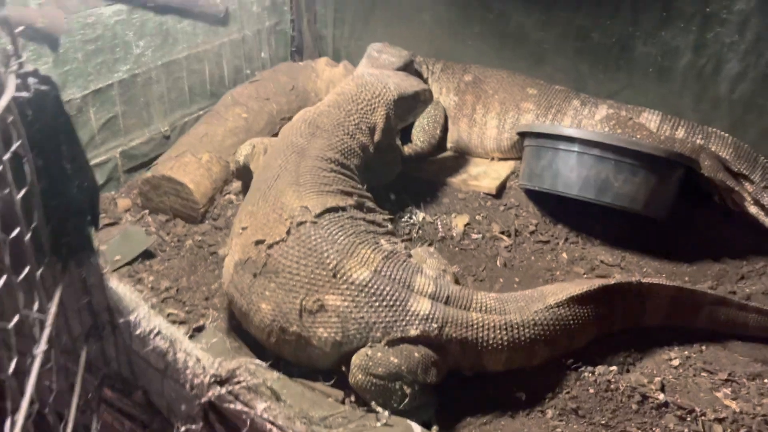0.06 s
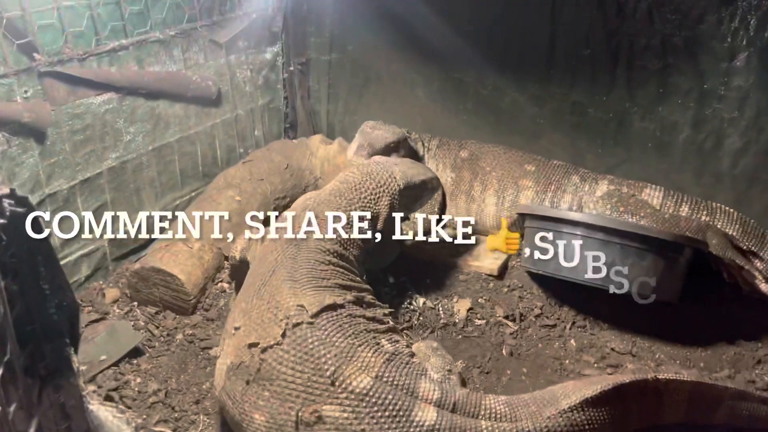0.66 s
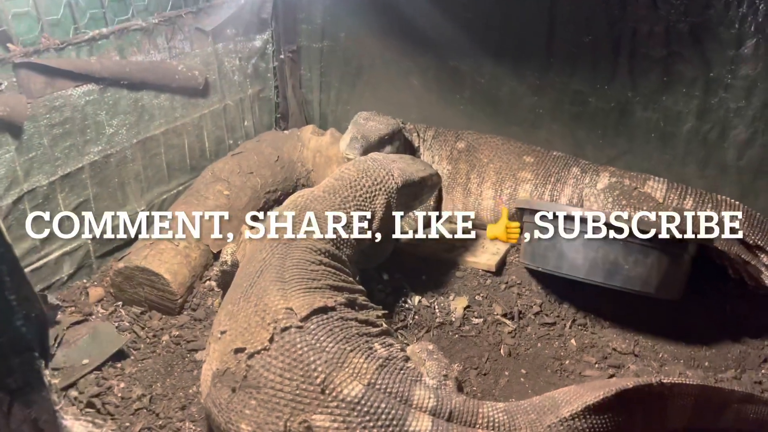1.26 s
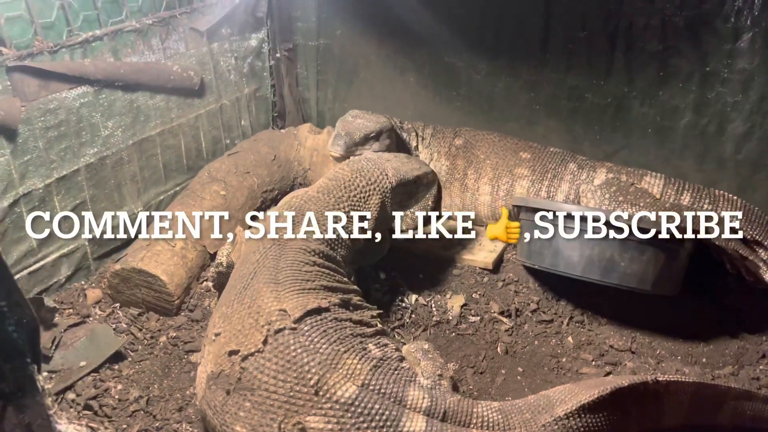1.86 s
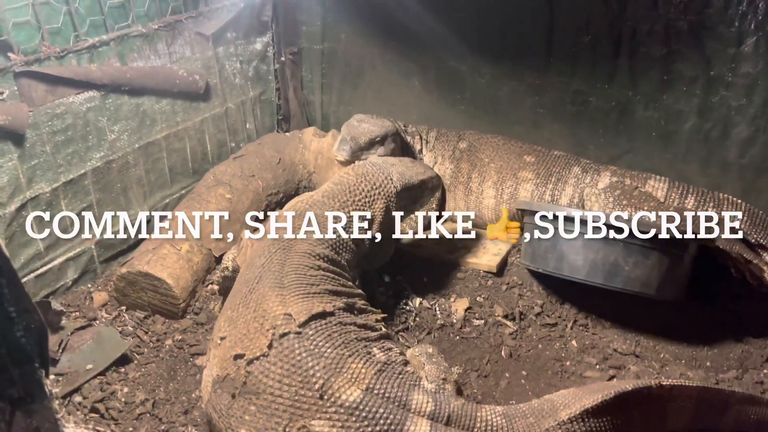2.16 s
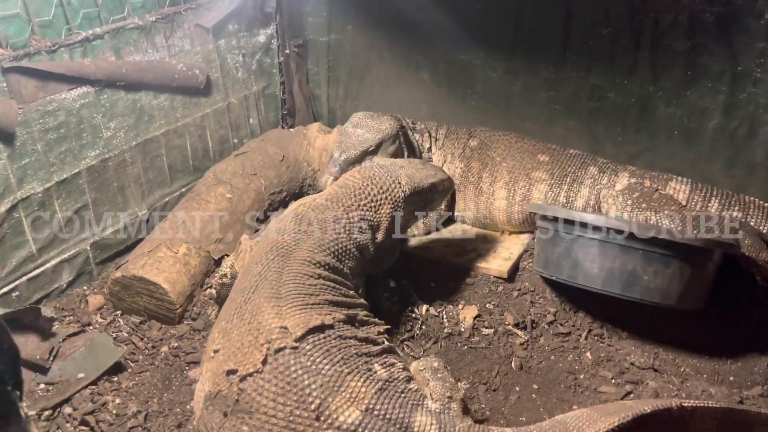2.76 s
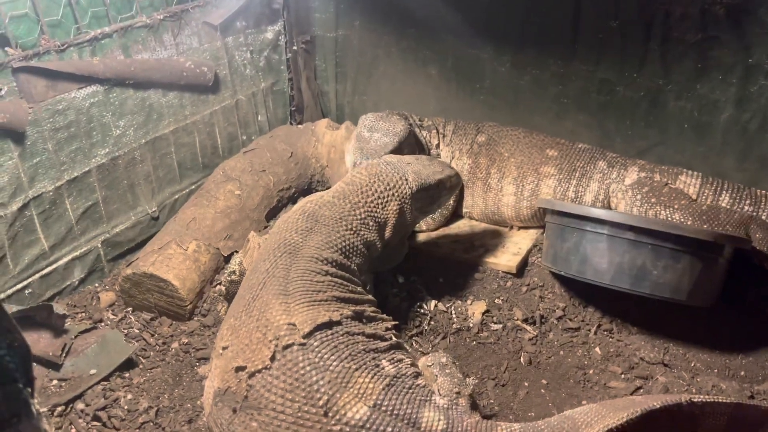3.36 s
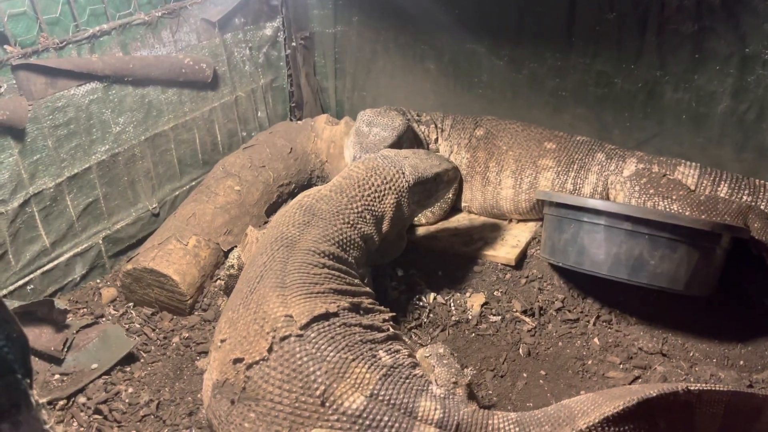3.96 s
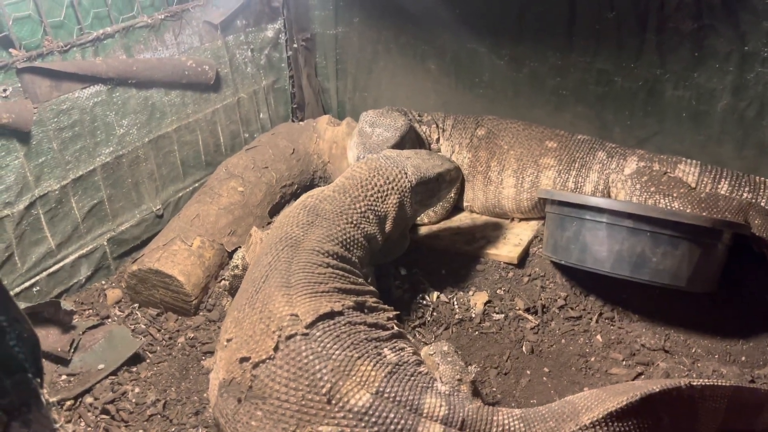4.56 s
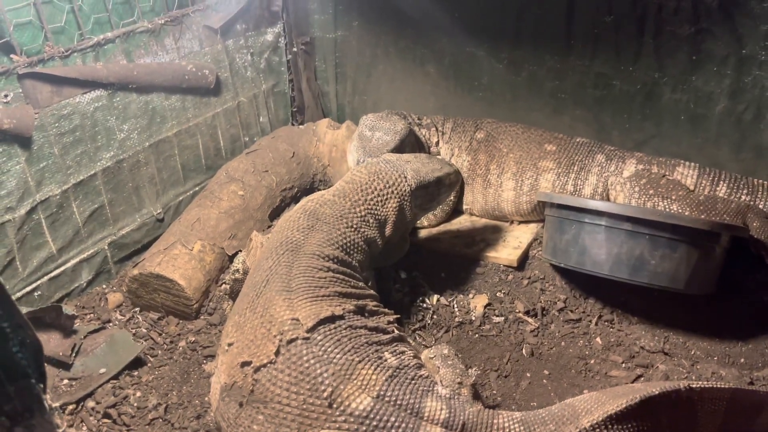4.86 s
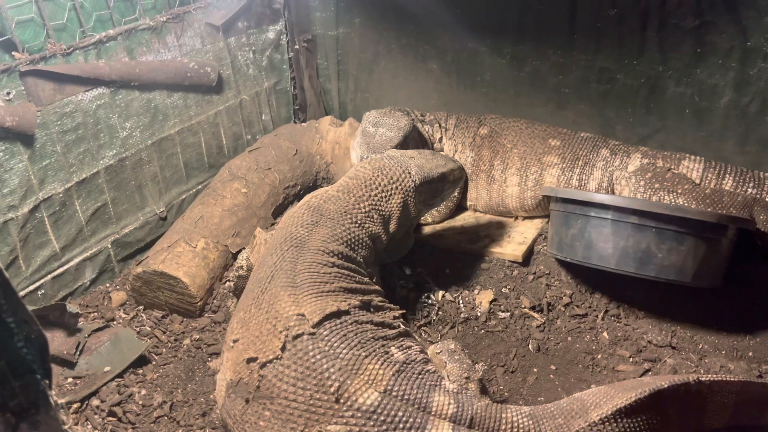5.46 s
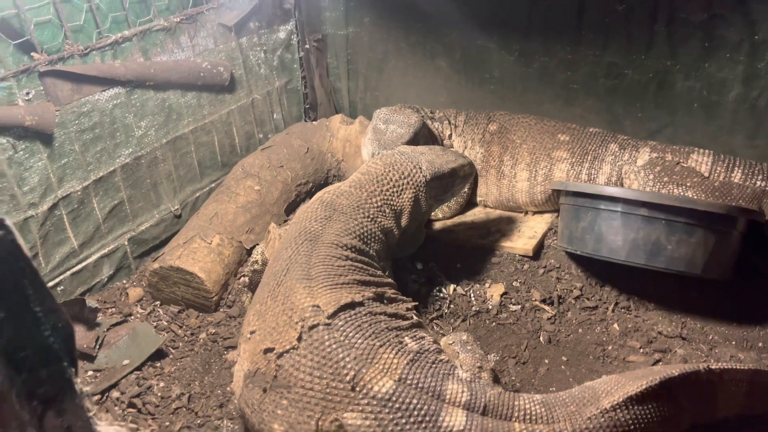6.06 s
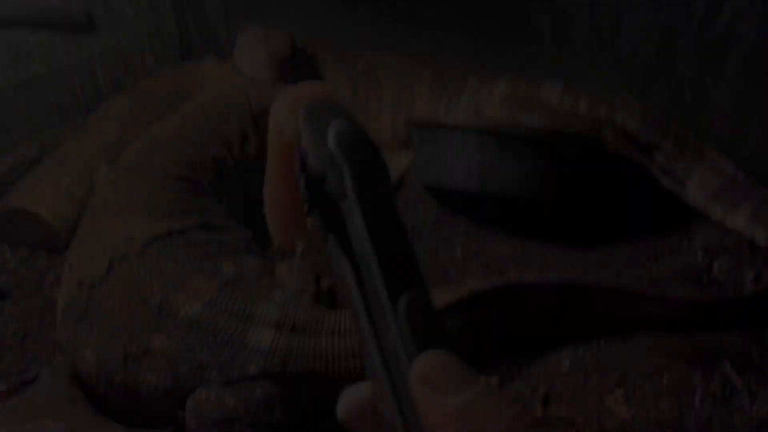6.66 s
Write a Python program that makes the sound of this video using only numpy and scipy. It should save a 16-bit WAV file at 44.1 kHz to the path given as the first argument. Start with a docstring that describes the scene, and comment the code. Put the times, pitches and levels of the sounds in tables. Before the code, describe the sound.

Sharp, close snaps of a training clicker come in three quick runs with short pauses, over faint room rumble and hiss.

```python
"""A small, quiet animal enclosure, heard from a hand-held camera: faint rumble, room air and hiss.
A hand settles its grip with tiny ticks and one knock. From 1.3 s a training clicker, close by, gives five
clicks: the button meets the steel tongue, which snaps through, buzzes and springs back; near walls ring
briefly, and the loose button ticks between strokes. The hiss sinks as the palm rubs and bumps the camera.
Two more runs of five follow at 3.1 s and 4.9 s, and a surge of hiss closes the scene."""
import sys
import numpy as np
from scipy import signal
from scipy.fft import rfft, irfft, next_fast_len
from scipy.io import wavfile
from scipy.ndimage import map_coordinates

SR = 44100
rng = np.random.default_rng(int(sys.argv[2]) if len(sys.argv) > 2 else 0)


def dump(signal):
    """Clip the signal to [-1, 1] and save it as 16-bit WAV at the path in sys.argv[1]."""
    limited = np.clip(np.atleast_2d(signal).T, -1, 1)
    pcm = np.round(limited * 32767).astype(np.int16)
    wavfile.write(sys.argv[1], SR, pcm)


N = 296660
TOP_HZ = 16600  # upper edge of the microphone's band

# likeness of left and right for direct and for diffuse sound: (frequency [Hz], correlation [-1..1])
DIRECT_LIKENESS = [(200, -0.93), (1200, 0.93), (2500, .3), (5000, -0.49), (6000, 0.66), (12000, 0.97)]
DIFFUSE_LIKENESS = [(100, 0.064), (400, 0.37), (900, -0.3), (5200, 0.11), (6000, 0.52), (12000, 1)]
# spectrum of the rumble and of bumps on the camera: (frequency [Hz], gain [dB])
RUMBLE_SPECTRUM = [(10, -23.5), (25, -4.5), (45, -0.5), (75, 3.5), (105, -1.5), (150, -13.5), (300, -31.5),
                   (1000, -74.5)]
# spectrum of a light touch on button or case: (frequency [Hz], gain [dB])
TICK_SPECTRUM = [(60, -9), (550, -12.5), (900, -7), (1300, -4), (1750, 1.5), (2300, -2), (3800, 2),
                 (5200, 3), (8000, -8), (10600, 2), (12200, -18.5), (13600, -45.5)]


def amp(db):
    """Decibels to amplitude."""
    return 10 ** (np.asarray(db) / 20)


def along(points, hz):
    """Read (frequency [Hz], value) points on a log frequency axis."""
    frequencies, values = np.transpose(points)
    return np.interp(np.log(hz + 1), np.log(frequencies + 1), values)


def level(points):
    """The gain of a (time [s], level [dB]) curve at every sample."""
    return amp(np.interp(np.arange(N) / SR, *np.transpose(points)))


def fade(t, t60):
    """An exponential decay, 60 dB down after t60 seconds."""
    return np.exp(-np.log(1000) * t / t60)


def add(track, at_s, sound):
    """Mix a stereo sound into the track."""
    start = round(at_s * SR)
    track[:, start:start + sound.shape[1]] += sound[:, :N - start]


def filtered(x, response):
    """Pass x through a complex response of frequency."""
    size = x.shape[-1]
    padded = next_fast_len(size + SR // 8)
    hz = np.fft.rfftfreq(padded, 1 / SR)
    return irfft(rfft(x, padded) * response(hz), padded)[..., :size]


def coloured(x, spectrum):
    """Shape x by a (frequency [Hz], gain [dB]) curve."""
    return filtered(x, lambda hz: amp(along(spectrum, hz)))


def causal(db):
    """The minimum-phase response with these gains: it rings only after the blow."""
    cepstrum = irfft(np.log(amp(db)))
    half = len(cepstrum) // 2
    fold = np.r_[1, np.full(half - 1, 2), 1, np.zeros(half - 1)]
    return np.exp(rfft(cepstrum * fold))


def stereo_noise(size, likeness):
    """White noise whose channels are as alike as given."""
    def mid_side_gains(hz):
        angle = np.arccos(np.clip(along(likeness, hz), -1, 1)) / 2
        return np.array([np.cos(angle), np.sin(angle)])
    mid, side = filtered(rng.standard_normal((2, size)), mid_side_gains)
    return np.array([mid + side, mid - side])


def bed(spectrum, waver_db, rate_hz):
    """Diffuse noise around the microphone; its level wavers a little."""
    noise = coloured(stereo_noise(N, DIFFUSE_LIKENESS), spectrum)
    t = np.arange(N) / SR
    waver = map_coordinates(rng.standard_normal(int(t[-1] * rate_hz) + 4), [t * rate_hz])
    return noise / noise.std() * amp(waver_db * waver)


def room_tone():
    """The enclosure itself: low rumble leaning left, room air and a thin, faint whistle."""
    # slow rise and fall of each layer: (time [s], relative level [dB])
    rumble_levels = [(0.0, -69), (0.37, -72.5), (0.96, -69.5), (1.44, -76), (2.79, -65), (3.45, -80.5),
                     (4.35, -84), (6.73, -76.5)]
    air_levels = [(0.0, -70.5), (0.28, -73), (1.35, -72), (1.46, -75.5), (2.9, -77.5), (4.33, -88),
                  (4.61, -83), (5.92, -84.5), (6.27, -73), (6.73, -76.5)]
    whistle_levels = [(0, -70.5), (2.5, -78), (4.4, -86.5), (6.73, -81.5)]
    # spectra of air and whistle: (frequency [Hz], gain [dB])
    air_spectrum = [(60, 0.5), (180, 0), (300, -5), (780, -6), (1050, -11), (1800, -18.5), (4500, -22.5),
                    (9000, -26.5), (12000, -49.5)]
    whistle_spectrum = [(2000, -34), (4500, -24.5), (5700, -11.5), (6500, 3.5), (7400, -16.5),
                        (9000, -17.5), (10200, -9), (12000, -41.5)]
    rumble = level(rumble_levels) * bed(RUMBLE_SPECTRUM, waver_db=1.8, rate_hz=18) * amp([[2], [-2]])
    air = level(air_levels) * bed(air_spectrum, waver_db=.8, rate_hz=9)
    whistle = level(whistle_levels) * bed(whistle_spectrum, waver_db=.5, rate_hz=3)
    return amp(4.5) * rumble + amp(5.5) * air + whistle


def hiss():
    """Hiss swells as the camera moves, sinks after the first run and surges as the camera draws back."""
    # brief swells of hiss: (time [s], level [dB])
    swells = [(0, -52), (.58, -64.5)]
    # spectra of the hiss and of its last surge: (frequency [Hz], gain [dB])
    hiss_spectrum = [(40, -11.5), (250, 6), (450, -2.5), (1000, 1), (1400, 6.5), (2400, 1.5), (4500, -1),
                     (6500, 0.5), (7800, -5.5), (10100, 4), (11300, -16), (12500, -26.5), (14000, -48.5)]
    surge_spectrum = [(40, -4), (250, 5.5), (450, -0.5), (1300, 1.5), (2400, -0.5), (4500, 1.5),
                      (6500, -1.5), (7800, -5), (10200, 10), (11500, -3.5), (12700, -17), (14000, -34)]
    t = np.arange(N) / SR
    gain = level([(2.34, -69), (2.8, -87)])
    for peak_s, db in swells:
        rise = np.clip(1 + (t - peak_s) / 0.094, 0, 1)
        gain += amp(db) * rise * fade(np.maximum(t - peak_s, 0), t60=0.73)
    opening = gain * bed(hiss_spectrum, waver_db=.9, rate_hz=30)
    from_s, to_s, attack_s, release_s = 6.01, 6.695, 0.087, 0.029
    surge = np.clip(np.minimum((t - from_s) / attack_s, (to_s - t) / release_s), 0, 1)
    return opening + amp(-52) * surge * bed(surge_spectrum, waver_db=.8, rate_hz=14)


def body_tone(hz, spectrum, bright_db, hollow_db, ring, corner_hz=6000):
    """Gain in dB of tongue and case; the grip shifts and weights their resonances anew each time."""
    # resonances above the broad spectrum: (frequency [Hz], width [Hz], relative height [dB])
    modes = [(1010, 48, 7), (1095, 50, -1.5), (1220, 160, 5.5), (1730, 210, 4.5), (2213, 190, 7.5),
             (2447, 100, 5.5), (3520, 670, 3), (4250, 230, 4), (6042, 620, 8), (7800, 180, 5.5)]
    weights, shifts = 1 + rng.standard_normal((2, len(modes))) * [[.18], [.003]]
    peaks = sum(db * weight / (1 + (2 * (hz - centre * shift) / width) ** 2)
                for (centre, width, db), weight, shift in zip(modes, weights, shifts))
    treble = 1 / (1 + (corner_hz / (hz + 1)) ** 4)
    hollow = 1 / (1 + (hz / 1800) ** 6)
    return along(spectrum, hz) + ring * peaks + bright_db * treble + hollow_db * hollow


def grip_ticks(level_db, spread_db, until_s, count):
    """Tiny dull random ticks of the hand settling its grip before the first run."""
    out = np.zeros((2, N))
    t = np.arange(SR // 40) / SR
    for when, strength in rng.random((count, 2)):
        burst = rng.standard_normal((2, len(t))) * fade(t, t60=0.027)
        add(out, when * until_s, amp(level_db + spread_db * strength ** 2) * burst)
    return filtered(out, lambda hz: amp(
        body_tone(hz, TICK_SPECTRUM, bright_db=-12, hollow_db=-1, ring=0.78, corner_hz=3010)))


def crack(size, spread_s):
    """The first kick of the steel; its bending waves disperse, the high ones arriving first."""
    kick = np.zeros((2, size))
    kick[:, 0] = 1
    return filtered(kick, lambda hz: np.exp(-2j * np.pi * spread_s * np.sqrt(hz * TOP_HZ)))


def walls(size):
    """A fresh diffuse tail off the close walls; each frequency dies at its own speed."""
    # reverberation of the enclosure: (frequency [Hz], time to fall 60 dB [s])
    decay_times = [(100, .2), (800, .36), (2300, .39), (5500, .41), (11500, .38), (14000, .15)]
    # colour of the tail: (frequency [Hz], gain [dB])
    wall_spectrum = [(200, -5), (600, 2), (780, 8.5), (1050, -1.5), (2000, -3), (2240, 0), (2500, -1.5),
                     (3100, -6), (4100, -1), (5600, 2), (8500, -3), (11500, -9.5), (12500, -6.5),
                     (13300, -17)]
    hz, t, bands = signal.stft(stereo_noise(size, DIFFUSE_LIKENESS), SR, nperseg=256)
    _, tail = signal.istft(bands * fade(t, along(decay_times, hz)[:, None]), SR, nperseg=256)
    return coloured(tail[:, :size], wall_spectrum)


def contact(tone_db, crack_db, rattle_t60, near_db, room_db):
    """One blow at the microphone: a crack, a fast rattle in case and hand, near reflections, the room."""
    size, attack = SR // 2, SR // 200
    t = np.arange(size) / SR
    rattle = stereo_noise(size, DIRECT_LIKENESS) * (fade(t, rattle_t60) + 0.41 * fade(t, t60=0.01))
    near = amp(near_db) * stereo_noise(size, DIFFUSE_LIKENESS) * fade(t, t60=0.1)
    reflections = (near + amp(room_db) * walls(size)) * (1 - fade(t, t60=0.0068))
    # only the crack keeps its highest treble in full
    blow = coloured(rattle + reflections, [(12700, -2), (13800, -10)])
    blow += amp(crack_db) * crack(size, spread_s=0.0004058)
    sound = filtered(blow, lambda hz: causal(tone_db(hz)))
    return sound / np.sqrt(np.mean(sound[:, :attack] ** 2))


def tick(bright_db):
    """One light contact of button or case."""
    tone = lambda hz: body_tone(hz, TICK_SPECTRUM, bright_db, hollow_db=0.5, ring=0.7, corner_hz=3500)
    return contact(tone, crack_db=9.5, rattle_t60=0.027, near_db=-4, room_db=-26.5)


def case_knock(at_s):
    """The case gives one dull knock as the hand takes its grip."""
    out = np.zeros((2, N))
    add(out, at_s, amp(-43.5) * tick(bright_db=-20))
    return out


def clicker():
    """The button meets the tongue; a short swell of hiss leads in, then it snaps, buzzes and springs back; the
    case thumps."""
    # strokes; an open grip lets out more treble and more hollow body: (snap time [s], level [dB],
    # press lead [s], return lag [s], openness [dB], relative thump level [dB], return re snap [dB])
    strokes = [(1.314, -13.5, .0195, 0.022, 4, -12, -9.5), (1.531, -14.5, 0.022, 0.017, 3.5, -7.5, -11),
               (1.753, -12.5, 0.023, .014, 3.5, -15.5, -13), (1.9519, -14, 0.022, .0197, -2.5, -8.5, -11),
               (2.155, -13, 0.013, .0189, -3.5, -11.5, -10), (3.068, -13, 0.016, 0.02, -1, -6.5, -10),
               (3.2722, -14.5, 0.019, 0.016, 4.5, -1, -7.5), (3.4823, -14.5, 0.015, .016, 1.5, -6.5, -6.5),
               (3.684, -14.5, 0.013, .017, 0, -5.5, -7.5), (3.8959, -14, 0.015, .0145, 0, -5.5, -10),
               (4.8613, -13.5, .0111, .0187, -5, -2.5, -14),
               (5.0753, -14.5, 0.013, 0.015, -2.5, -25, -10.5),
               (5.2921, -12.5, 0.016, 0.016, -1.5, -34, -15.5),
               (5.4962, -13.5, 0.011, 0.013, -3.5, -16, -11), (5.701, -13.5, 0.014, .013, -1.5, -12.5, -18)]
    # spectra of press, snap and the small case's bass-shy thump: (frequency [Hz], gain [dB])
    press_spectrum = [(100, -36), (900, -21.5), (1500, -16), (2300, -7.5), (4000, -8.5), (5200, -3),
                      (8700, -7.5), (10600, -2), (12200, -12), (13600, -32.5), (16000, -40.5)]
    snap_spectrum = [(60, -33), (220, -32), (550, -30.5), (900, -24.5), (1500, -12), (1980, -8.5),
                     (2200, -3.5), (4000, 1.5), (5200, -6.5), (7200, -11), (8700, -8), (10600, 1),
                     (12200, -8.5), (13600, -28.5), (16000, -48)]
    case_spectrum = [(50, -10), (120, -3), (260, 3), (450, 0)]
    press_db, swell_in_db, buzz_db, case_db = -20, -7, -10, -15  # relative to the snap
    press_pan, snap_pan = amp([[1], [-1.4]]), amp([[-.75], [.75]])
    press_tone = lambda hz: body_tone(hz, press_spectrum, bright_db=6.5, hollow_db=1.5, ring=1.7)
    return_tone = lambda hz: body_tone(hz, snap_spectrum, bright_db=0.5, hollow_db=5.0, ring=1.08)
    push = filtered(thump(centre_hz=193, delay_s=0.0019), lambda hz: causal(along(case_spectrum, hz)))
    out = np.zeros((2, N))
    for at_s, db, lead_s, lag_s, open_db, thump_db, return_db in strokes:
        press = contact(press_tone, crack_db=7.0, rattle_t60=0.044, near_db=-7.5, room_db=-30.5)
        add(out, at_s - lead_s, amp(db + press_db) * press_pan * press)
        rising = swell_in(rise_t60=0.03, lean_db=13)
        add(out, at_s - rising.shape[1] / SR, amp(db + swell_in_db) * rising)
        snap_tone = lambda hz: body_tone(hz, snap_spectrum, open_db, hollow_db=1.4 * open_db, ring=1.05)
        snap = contact(snap_tone, crack_db=12.5, rattle_t60=0.033, near_db=-8.5, room_db=-26.5)
        add(out, at_s, amp(db) * snap_pan * snap)
        add(out, at_s, amp(db + thump_db + case_db) * push)
        add(out, at_s, amp(db + buzz_db) * snap_pan * buzz(peak_s=0.0058, width_s=0.0023))
        spring_back = contact(return_tone, crack_db=10.5, rattle_t60=0.035, near_db=-6, room_db=-20)
        add(out, at_s + lag_s, amp(db + return_db) * spring_back)
    return out


def swell_in(rise_t60, lean_db):
    """A short swell of hiss that leads into the snap, mostly on the right."""
    # spectrum of the swell: (frequency [Hz], gain [dB])
    swell_spectrum = [(100, -34.5), (800, -27.5), (1500, -15.5), (2050, -14), (2350, 5.5), (2900, -17),
                      (4300, -16.5), (5500, -8.5), (6300, -4), (8000, -22), (11000, -28), (13500, -42.5)]
    size = SR // 70
    noise = coloured(stereo_noise(size, DIRECT_LIKENESS), swell_spectrum)
    until_snap_s = np.arange(size)[::-1] / SR
    return noise / noise.std() * fade(until_snap_s, rise_t60) * amp([[-lean_db], [0]])


def thump(centre_hz, delay_s):
    """One low push between hand and case, without any ring."""
    phase = 2 * np.pi * centre_hz * np.maximum(np.arange(SR // 25) / SR - delay_s, 0)
    return np.tile(phase * (2 - phase) * np.exp(-phase), (2, 1))


def buzz(peak_s, width_s):
    """A brief bright buzz of the tongue against its stop, just after the snap."""
    # spectrum of the buzz: (frequency [Hz], gain [dB])
    buzz_spectrum = [(1000, -45), (4500, -19.5), (6000, -6.5), (8000, -9.5), (10600, 1.5), (12200, -4),
                     (13600, -33), (16000, -48)]
    t = np.arange(SR // 50) / SR
    noise = coloured(stereo_noise(len(t), DIRECT_LIKENESS), buzz_spectrum)
    return noise / noise.std() * np.exp(-.5 * ((t - peak_s) / width_s) ** 2)


def loose_button():
    """The button reseats as the thumb eases off, sometimes with a weaker, duller catch first."""
    # ticks of the button: (time [s], level [dB], brightness [dB])
    reseats = [(1.47, -40.5, -11.5), (1.686, -38.5, 6), (1.8865, -41, 0.5), (2.1081, -43, -1),
               (2.332, -42.5, -1.5), (3.2137, -54, -10.5), (3.4295, -48, -3.5), (3.6365, -47, -6.5),
               (3.844, -38.5, -0.5), (4.0695, -36, 4), (4.7203, -61, 20), (5.23, -43, 5.5), (5.64, -43, 2),
               (5.8976, -41, 2.5), (5.952, -57, 0)]
    # ticks at which it catches before it seats: (time [s])
    catches = [1.686, 2.1079, 3.844, 5.8979]
    out = np.zeros((2, N))
    for at_s, db, bright_db in reseats:
        add(out, at_s, amp(db) * tick(bright_db))
        if np.isclose(at_s, catches, atol=.01).any():
            add(out, at_s - .013, amp(db - 5.5) * tick(bright_db - 4.5))
    return out


def palm_rub(from_s, to_s, fade_s):
    """The palm slides along the camera: a soft low rustle right at the microphone."""
    # spectrum of the rustle: (frequency [Hz], gain [dB])
    rub_spectrum = [(80, -8), (250, 4), (500, -1.5), (800, 3), (1200, -17), (4000, -35.5)]
    t = np.arange(N) / SR
    envelope = np.clip(np.minimum(t - from_s, to_s - t) / fade_s, 0, 1)
    return amp(-74.5) * envelope * bed(rub_spectrum, waver_db=2.5, rate_hz=22)


def hand_bumps(from_s, gap_s, count):
    """The hand shifts on the camera in uneven nudges, nearer the left microphone port."""
    out = np.zeros((2, N))
    nudge = amp([[0], [-4]]) * thump(centre_hz=69.7, delay_s=0)
    for k, (late, strength) in enumerate(rng.standard_normal((count, 2))):
        add(out, from_s + gap_s * (k + .12 * late), amp(-39.5 + 2 * strength) * nudge)
    return coloured(out, RUMBLE_SPECTRUM)


def scene():
    """The clicker and the hands that hold it and the camera, over the quiet of the enclosure."""
    hands = grip_ticks(level_db=-60.5, spread_db=15.5, until_s=1.25, count=40)
    hands += hand_bumps(from_s=2.38, gap_s=0.078, count=8)
    hands += palm_rub(from_s=2.33, to_s=3.15, fade_s=.12)
    return clicker() + case_knock(at_s=.2628) + loose_button() + hands + room_tone() + hiss()


def microphone(hz, lag_hz):
    """The bass arrives late, so each thump sweeps down; left and right turn out of phase in the top treble."""
    # phase of the right channel against the left: (frequency [Hz], phase [rad])
    channel_phase = [(8850, 0), (9700, np.pi), (10450, np.pi), (11400, 2 * np.pi)]
    bass_lag = ((lag_hz - 1j * hz) / (lag_hz + 1j * hz)) ** 4
    return bass_lag * np.exp(1j * along(channel_phase, hz) * np.array([[0], [1]]))


def record(dry):
    """The stereo microphone shifts the phase, softly rounds the peaks and limits the band."""
    picked_up = filtered(dry, lambda hz: microphone(hz, lag_hz=114))
    rounded = picked_up / (1 + (picked_up / .95) ** 6) ** (1 / 6)
    return filtered(rounded, lambda hz: 1 / (1 + (hz / TOP_HZ) ** 120))


dry = scene()
out = record(dry)
dump(out)
```